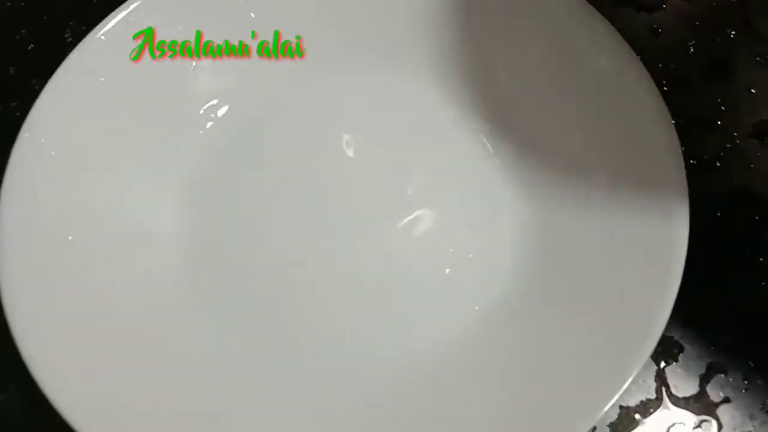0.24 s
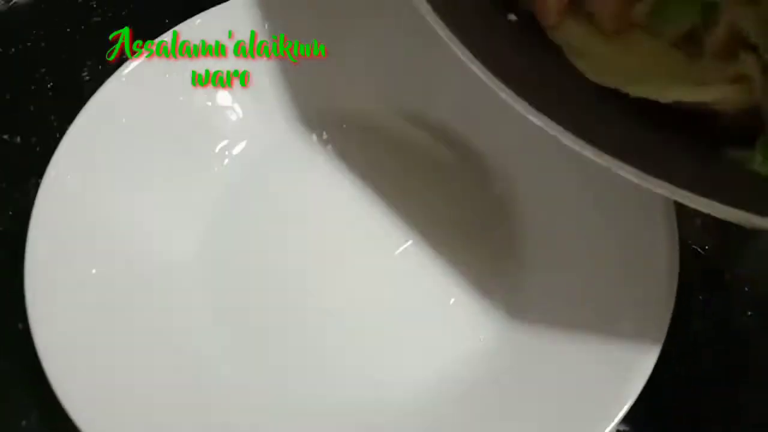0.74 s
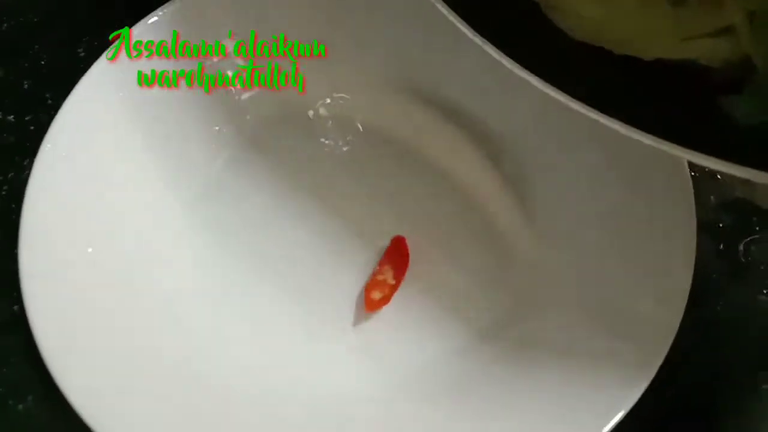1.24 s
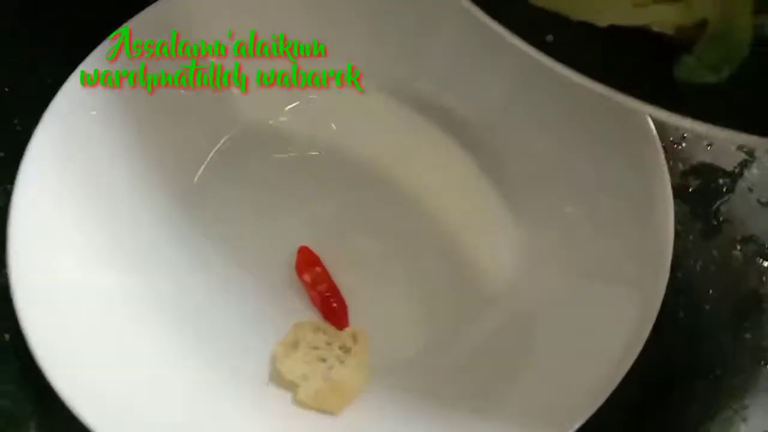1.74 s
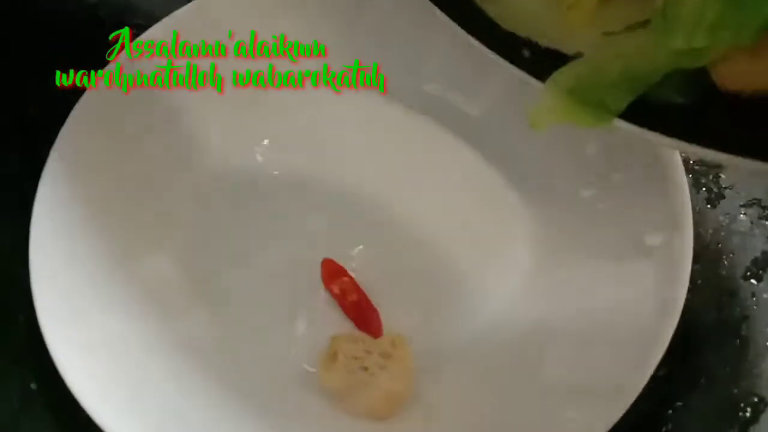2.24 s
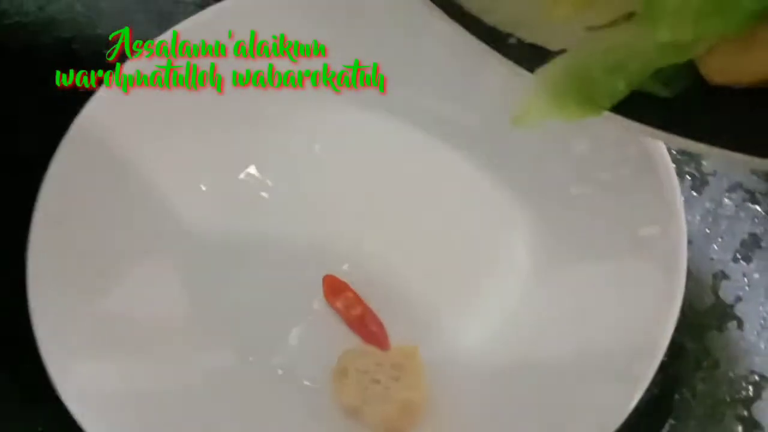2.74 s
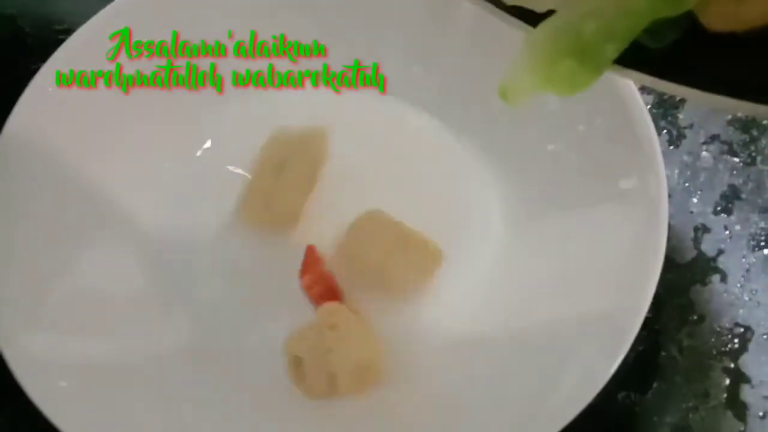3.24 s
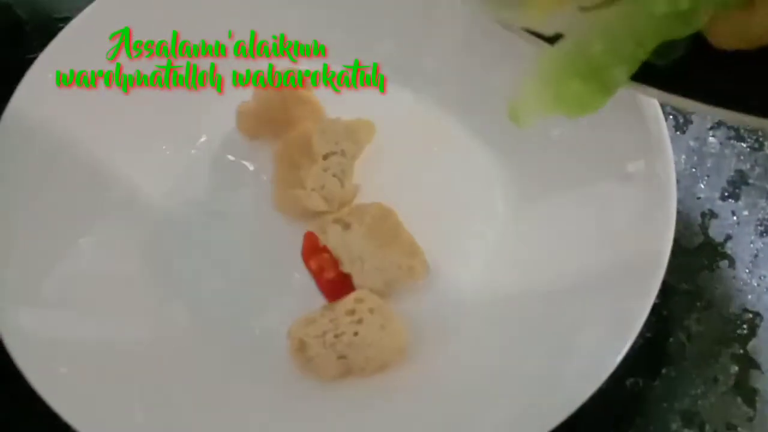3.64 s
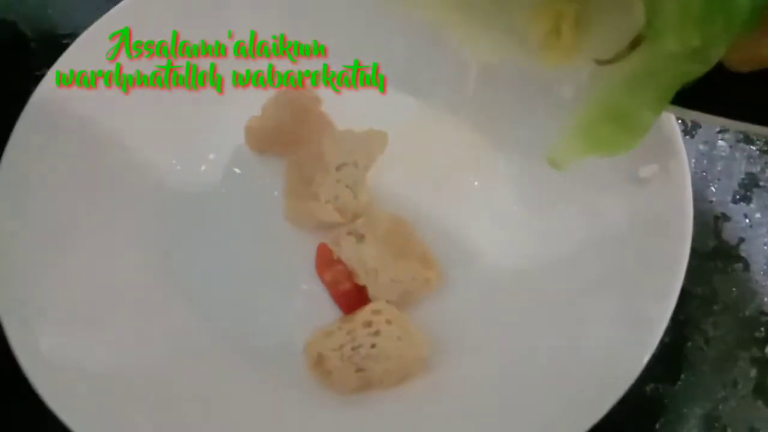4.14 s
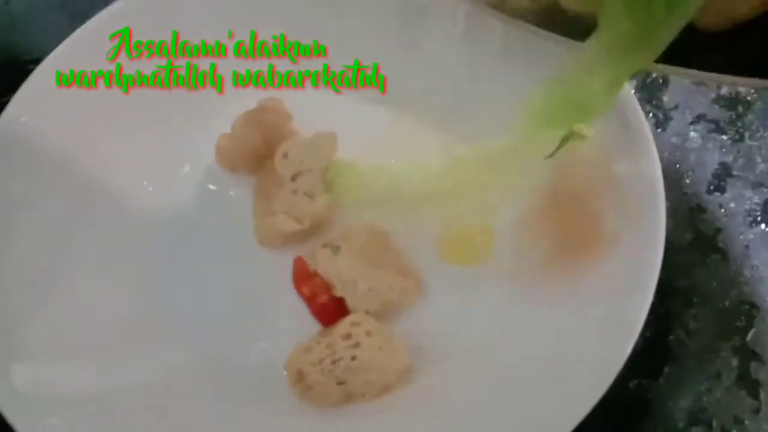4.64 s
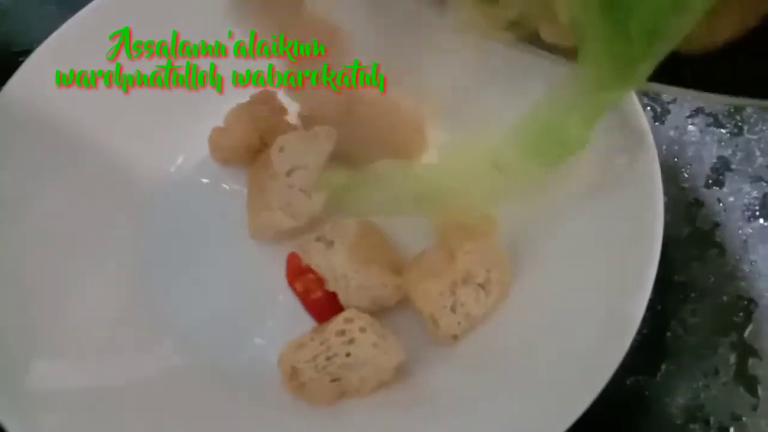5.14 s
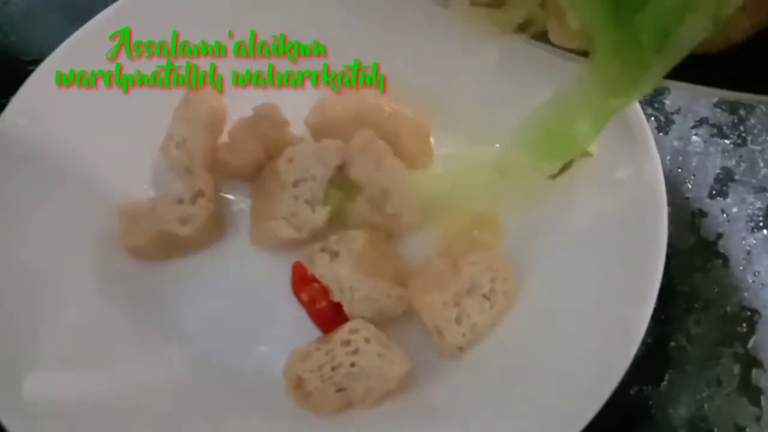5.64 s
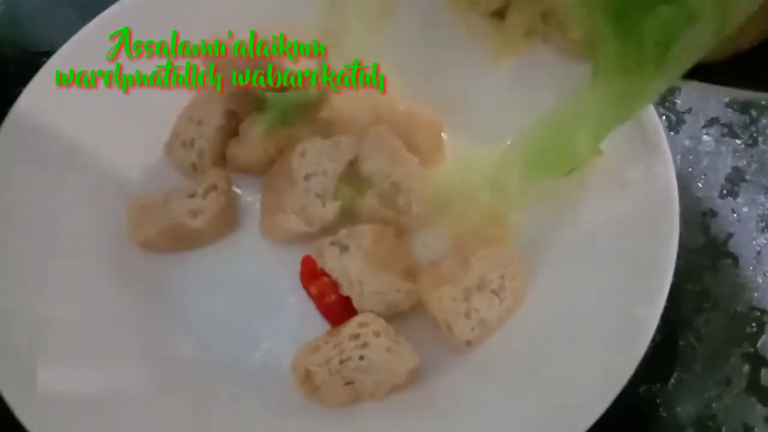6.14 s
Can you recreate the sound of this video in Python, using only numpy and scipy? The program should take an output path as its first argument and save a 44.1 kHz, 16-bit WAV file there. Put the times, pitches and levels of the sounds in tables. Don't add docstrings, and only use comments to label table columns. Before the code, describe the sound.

A metal pan is emptied onto a plate, heard close up on a phone microphone in a quiet kitchen. After a nearly silent start with slight squeaks, one strong, blunt metal knock stands far above everything else. Quiet rasping, ringing and low pan hum follow, with crisp little ticks and fat spits. Later come clusters of small food landings, lightly ringing the ceramic, densest at the end.

```python
import sys
import numpy as np
from scipy import signal
from scipy.fft import rfft, irfft, next_fast_len
from scipy.io import wavfile
from scipy.ndimage import uniform_filter1d

SR = 44100
rng = np.random.default_rng(int(sys.argv[2]) if len(sys.argv) > 2 else 0)


def volts_from_db(level):
    exponent = np.asarray(level, float) / 20
    return 10 ** exponent


def materialize(psi):
    bounded = np.clip(np.atleast_2d(psi).T, -1, 1)
    quanta = np.round(bounded * 32767).astype(np.int16)
    wavfile.write(sys.argv[1], SR, quanta)


N = 281358

# time_s, rasp_db (pressure), ring_db (lean on the pan wall)
DRAG = [(0.0, -96, -63.5), (0.42, -99, -76), (0.58, -71, -72), (0.78, -61.5, -65), (1.05, -66.5, -60.5),
        (1.22, -51.5, -58.5), (1.75, -51.5, -55.5), (2.2, -53, -67), (2.7, -49, -59), (3.07, -51.5, -72),
        (3.34, -51, -54), (3.62, -59, -59), (3.94, -56.5, -55.5), (4.3, -62, -60.5), (5.05, -60.5, -58),
        (5.4, -68.5, -60.5), (6.06, -59.5, -56), (6.38, -61.5, -63)]
# freq_hz, level_db
RASP_COLOUR = [(150, -43.5), (250, -20.5), (317, 0), (523, -24), (967, -13.5), (1160, -10), (1280, 3.5),
               (1550, -8.5), (2600, -2.5), (4240, -11.5), (5150, -10), (6350, -16), (7000, -9.5),
               (9100, -91), (15400, -120)]
# freq_hz, level_db
BRIGHT_COLOUR = [(3530, -29), (6000, -0.5), (6350, -21), (7500, 1.5), (8200, -6.5), (9960, -2.5),
                 (11700, -9.5), (13600, -23), (14900, -8.5), (15800, -10)]
# time_s, bright_lift_db
STEAM = [(0, 9), (1.2, -2), (1.5, 0), (2.4, -4), (3.0, -5.5), (3.75, 0.5), (3.85, 2.5), (4.2, 3),
         (4.4, 3.5), (4.6, 4.5), (4.8, 3.5), (5.2, 6), (5.5, 6), (6.38, 1)]
# freq_hz, width_hz, level_db
RIM_RESONANCES = [(805, 7, 5.4), (1853, 87, 2.7), (2315, 39, 1.1), (2670, 24, 0.78), (3527, 80, 2),
                  (5150, 200, 6), (5500, 200, 4)]
# freq_hz, width_hz, level_db
WALL_RESONANCES = [(1110, 14, -3), (1280, 21, 13.5), (1370, 62, -7.5), (1370, 27, -26)]
# start_s, hold_s, ring_db
LEANS = [(0.1, 0.053, -60), (0.22, 0.16, -62.5), (0.48, 0.11, -63.5), (0.7, 0.18, -58), (1.3, .14, -67),
         (1.553, 0.1, -61), (1.693, 0.021, -52), (1.907, 0.063, -54.5), (2.374, 0.026, -55),
         (2.531, 0.037, -56), (2.653, 0.14, -54.5), (2.876, 0.046, -56), (3.154, .25, -56),
         (3.439, 0.029, -53), (3.679, 0.048, -55), (3.926, 0.17, -57.5), (4.319, 0.046, -57),
         (4.45, .05, -59), (4.579, 0.011, -52.5), (4.62, 0.054, -54), (5.163, 0.016, -55),
         (5.61, 0.02, -58), (5.95, 0.058, -61), (6.29, 0.028, -62)]
# freq_hz, width_hz, level_db
BOTTOM_RESONANCES = [(111.3, 1.8, 9.5), (122.4, 4.4, 7.5), (146.25, 3.8, 16.5), (199, 4, 2.5)]
# start_s, hold_s, hum_db
SHUDDERS = [(0.107, 0.12, -52), (0.325, 0.026, -61), (0.546, 0.16, -65.5), (0.765, 0.1, -49),
            (1.04, 0.13, -51), (1.33, 0.043, -54), (1.48, 0.061, -53.5), (1.617, 0.097, -48.5),
            (1.838, 0.24, -51), (2.183, 0.036, -58.5), (2.325, 0.067, -58), (2.504, 0.04, -50.5),
            (2.603, 0.12, -50), (2.827, 0.077, -48), (2.976, 0.015, -53), (3.096, 0.13, -60),
            (3.348, 0.092, -54), (3.69, 0.015, -53.5), (3.813, 0.3, -48), (4.338, 0.035, -48),
            (4.543, 0.14, -57), (4.798, .05, -49), (4.966, 0.087, -47), (5.144, 0.17, -62),
            (5.562, 0.06, -49.5), (5.778, 0.025, -55), (5.87, 0.043, -54), (6.065, 0.21, -49)]
# freq_hz, width_hz, level_db
FLOOR_RESONANCES = [(236, 124, -11.5), (320, 23, -10.5), (362, 160, -13)]
# start_s, hold_s, hum_db
RUBS_EARLY = [
    (0.009, 0.25, -64),
    (0.34, 0.034, -73),
    (0.53, 0.072, -74),
    (0.687, 0.21, -75),
    (1.03, 0.053, -64),
]
RUBS_MIDDLE = [(1.457, 0.037, -53), (1.537, 0.057, -57), (1.671, 0.057, -55), (1.778, 0.099, -53),
               (1.964, 0.071, -52), (2.054, 0.047, -62), (2.217, 0.061, -63), (2.359, 0.045, -56),
               (2.599, 0.058, -56), (2.7, 0.045, -67), (2.836, 0.029, -73), (2.89, 0.08, -63),
               (3.018, 0.061, -60), (3.107, 0.061, -55), (3.281, 0.2, -56), (3.696, 0.035, -57),
               (3.79, 0.075, -52), (3.916, 0.089, -55), (4.109, 0.028, -62), (4.197, 0.052, -56),
               (4.349, 0.064, -61), (4.662, 0.025, -53), (4.836, 0.039, -56)]
RUBS_LATE = [
    (5.125, 0.042, -60),
    (5.227, 0.053, -77),
    (5.307, 0.052, -56.5),
    (5.467, 0.074, -65),
]
# start_s, length_s, from_hz, to_hz, level_db
SQUEAKS = [(0.03, 0.036, 1850, 1880, -74), (0.103, 0.17, 4970, 5000, -76), (0.471, 0.14, 4830, 5200, -74),
           (0.55, 0.054, 3850, 3770, -75), (0.557, 0.047, 3120, 3000, -70), (0.7, 0.19, 4500, 4640, -73),
           (0.716, 0.064, 4000, 4000, -69), (0.73, 0.16, 1825, 1910, -65.5), (0.74, 0.095, 2150, 2300, -67),
           (0.735, .12, 3250, 3400, -72), (0.98, 0.12, 5340, 5280, -69), (0.992, 0.082, 2250, 2360, -69),
           (2.4, .15, 5100, 5150, -73), (2.62, 0.22, 5120, 5100, -62), (2.65, 0.32, 5900, 5640, -64),
           (2.818, .22, 5040, 5100, -69), (2.88, 0.2, 5930, 5750, -66), (2.503, 0.22, 3470, 3380, -66),
           (3.05, .12, 5200, 5100, -76), (3.403, 0.088, 3320, 3270, -61), (4.335, .03, 1650, 1670, -65),
           (4.572, 0.05, 3300, 3300, -65), (4.555, 0.036, 1620, 1680, -63.5), (4.78, .06, 2300, 2250, -66),
           (5.53, .12, 5350, 5450, -65.5), (5.63, 0.093, 5150, 4900, -69), (5.62, .04, 3600, 3780, -68),
           (5.717, .02, 2650, 2750, -66), (5.72, 0.074, 4800, 4850, -70), (5.79, .07, 5200, 5330, -72),
           (1.353, 0.5, 5230, 5120, -69), (3.551, .45, 5240, 5250, -72), (4.107, .45, 5170, 5320, -76),
           (4.599, 0.54, 5300, 5410, -70.5), (5.102, .4, 5350, 5200, -70), (5.9, 0.42, 5240, 5200, -70)]
# freq_hz, level_db, t60_s
PAN_MODES = [(145, -13, .2), (224, -15, .15), (285, -8, .12), (314, -12, .2), (364, -17, .16),
             (452, -14, .33), (473, 0, .125), (515, -8, .12), (593, -3, .1), (651, -23, .2), (831, 3, .18),
             (864, -9, .2), (942, -13, .12), (1030, -12, .12), (1061, -16, .35), (1193, -6, .21),
             (1329, -12, .55), (1356, -17, .25), (1755, -19, .45), (2581, -13, .4), (2620, -22, .2),
             (2870, -14, .16), (2974, -21, .2), (3101, -17, .17), (3268, -18, .2), (3951, -20, .17),
             (4334, -19, .17), (4829, -20, .12), (5071, -21, .17)]
# low_hz, high_hz, level_db, t60_s
PAN_CLATTER = [(150, 620, -14.5, .3), (650, 1500, -13.5, .22), (1500, 2500, -22, .2), (2600, 5600, -9, .21),
               (6600, 7900, -20, .24), (8500, 14000, -20, .11)]
# start_s, strength_db, middle_db, high_db, contact_ms
KNOCKS = [
    (1.061, -25, -2.5, 2, 1.7),
    (1.0645, -32.5, -33, -30, 1.2),
    (1.087, -14.5, -21, -42, 6.1),
    (1.096, -24, -0.5, -4.5, 8.5),
    (1.104, -41, 11, -33, 6.3),
]
# freq_hz, level_db, t60_s
LANDING_MODES = [(221, 5, 0.14), (292, 4, .14), (438, -22, .12), (470.7, -3, 0.11), (583, 2, 0.085),
                 (623, -20, 0.11), (797, -9, 0.17), (1060, -8, 0.27), (1330, -6, 0.2), (1620, -15, .1)]
# start_s, strength_db, middle_db, high_db, contact_ms
LANDINGS = [
    (1.341, -39, -6, -20, 1.8),
    (1.351, -42, -5, -20, 2.7),
    (1.372, -41.5, -8, -20, 2.1),
    (1.408, -56, 8, -20, 5.4),
]
# freq_hz, level_db, t60_s
PLATE_MODES = [(278, 4, 0.029), (319.6, 6, 0.083), (428, 1, 0.085), (579.5, 3, 0.076), (622.6, -7.5, 0.23),
               (734, -12, 0.17), (869.5, -1.5, 0.049), (930, -13.5, 0.062), (998, -11, 0.16),
               (1025, 1.5, 0.13), (1287, 3.5, 0.043), (1470, -0.5, 0.032), (1510, -22, 0.019),
               (1790, -20, 0.23), (1925, -26.5, 0.15), (2300, -11, 0.033), (2705, -18, 0.082)]
# low_hz, high_hz, level_db, t60_s
PLATE_CLATTER = [(250, 900, -8, .13), (900, 1700, -7, .09), (1900, 7500, -10.5, .11)]
# start_s, strength_db, middle_db, high_db, contact_ms
DROPS = [(4.879, -55, -5, -20, 2.7), (4.8925, -33, -10, -13, 0.18), (4.899, -44.5, 13.5, 4, 7.1),
         (4.9155, -30.5, -3.5, -7, 0.35), (4.932, -45, 3, -13, 5.5), (4.946, -45, -10, -10, 5.8),
         (4.962, -45, 11.5, -13, 7.2), (4.975, -32.5, -3, 4, 12), (4.998, -43, 3, 0, 10),
         (5.021, -45, -3, -17, 3.1), (5.0375, -27.5, 1, -8, 0.42), (5.091, -49, 4, -10, 5),
         (5.167, -57, -1, 12.5, 2.5), (5.561, -40.5, -6, 4, 7.4), (5.58, -38.5, 1, 0, 10.6),
         (5.612, -45, -6, 0, 4.4), (5.667, -31, -29, -17, 11), (5.6965, -38.5, -1.5, -7, 0.63),
         (5.973, -47, -11, -18, 2.6), (5.985, -42, -10, -25, 7), (5.993, -31, -7, -31, 8.8),
         (6.0085, -33, 3.5, 1, 0.3), (6.036, -44, -5, -20, 4.3), (6.048, -31, -9, -22, 7.5),
         (6.068, -32, 3.5, 5, 9.3), (6.089, -40, -10, -14, 6.7), (6.104, -36, -11, -20, 11),
         (6.116, -39, -2.5, -17, 5.6), (6.136, -31.5, 2, -2.5, 0.73), (6.147, -36, 0, -8, 1.1),
         (6.172, -47, 4.5, -6, 2.7), (6.371, -43.5, 13.5, 7.5, 2.3)]
# start_s, peak_db, centre_hz
TICKS = [(0.9434, -41, 6140), (1.322, -52, 1390), (1.3227, -34.5, 2100), (1.344, -34, 2670),
         (1.488, -36.5, 2800), (1.541, -35, 3280), (1.875, -30, 3460), (1.9528, -32, 3400),
         (2.364, -25, 4330), (2.529, -38, 2230), (2.6613, -38.5, 4800), (2.838, -43, 2590),
         (3.185, -50, 2280), (3.251, -27.5, 3300), (3.3043, -38.5, 5500), (3.3402, -36, 2530),
         (3.455, -36.5, 4430), (3.681, -45, 3330), (4.9782, -31, 4780), (5.0383, -28, 4370),
         (5.1656, -40.5, 3650), (5.8647, -39, 4200), (5.875, -41, 2130), (5.885, -46, 4000),
         (6.01, -45, 2440), (6.078, -25.5, 4960)]
# start_s, peak_db, centre_hz
SPITS = [(0.9458, -42, 9100), (1.064, -27, 9700), (1.322, -39, 8700), (1.491, -29, 11600),
         (1.582, -41, 10300), (1.6053, -42, 10500), (1.623, -36, 11100), (1.767, -36.5, 8600),
         (1.824, -39, 11900), (1.876, -33.5, 8900), (1.8754, -36, 14000), (1.907, -35, 10900),
         (2.012, -42.5, 9700), (2.3014, -39, 9200), (2.365, -29, 9200), (2.785, -40, 9400),
         (3.254, -36, 11400), (3.306, -41, 10100), (4.143, -43.5, 9400), (4.585, -39.5, 11100),
         (4.974, -41, 8300), (5.8645, -37.5, 7200), (5.883, -46, 8950), (5.94, -50, 7200),
         (6.01, -41, 5100), (6.046, -48, 8000), (6.372, -40.5, 7640), (6.0765, -40, 8100)]
# start_s, peak_db, centre_hz, length_ms
SCUFFS = [
    (3.225, -42.5, 1060, 45),
    (3.27, -47.5, 744, 38),
    (3.30, -47, 400, 110),
    (3.335, -41, 1400, 23),
    (3.37, -49, 740, 17),
    (2.70, -43, 1610, 38),
    (2.88, -53.5, 885, 89),
    (3.345, -58, 2600, 14),
]
# start_s, peak_db, pitch_hz, length_ms
THUDS = [
    (1.0611, -2.5, 192, 1.64),
    (1.0638, -4.5, 81, 7.9),
    (1.3422, -22, 236, 4.5),
    (1.347, -20, 77, 12),
    (1.371, -33, 291, 39),
    (1.701, -47, 80, 10),
    (3.126, -32, 80, 14),
    (3.825, -20.5, 75, 23),
    (4.916, -36, 305, 7.9),
    (5.992, -30, 298, 28),
]
# freq_hz, level_db
HISS_COLOUR = [(15, -48), (25, -21), (144, 7.5), (248, -10), (382, -0.5), (437, -11), (691, -13.5),
               (881, -13.5), (1280, -12), (1590, -17), (3780, -20), (5500, -23.5), (6310, -25),
               (15800, -35.5)]
# freq_hz, level_db
SIDE_COLOUR = [(15, -29), (25, -6), (130, -10), (222, -14), (392, -15), (513, -8.5), (955, -17),
               (1280, 1.5), (1470, -11.5), (5670, -23.5), (7220, -48), (14600, -27.5), (15800, -33)]
# freq_hz, level_db
MIC = [(20, -31), (60, -42), (100, -3.5), (5300, -3), (6350, -3.5), (7300, -4), (10000, -5), (13600, -13),
       (15000, 4), (16300, -23), (18000, -67)]

FIRM_DB = -55


def drag():
    rasp_db = curves(DRAG)[0]
    bright_db = -63.5 + 0.88 * (rasp_db - FIRM_DB) + curves(STEAM)[0]
    bright_db[:int(np.ceil(0.73 * SR))] -= 3
    slips = level(grit(3500, 0.5), 0) * volts_from_db(2.0 * walk(29.96))
    rim = resonate(slips, RIM_RESONANCES) * volts_from_db(-21.5)
    rasp = level(coloured(level(slips, 0) + rim, RASP_COLOUR), 0)
    bright = level(coloured(slips * volts_from_db(0.5 * walk(20.0)), BRIGHT_COLOUR), 0)
    return rasp * volts_from_db(rasp_db - 4.0) + bright * volts_from_db(bright_db - 4.0)


def wall():
    sing = level(resonate(rng.standard_normal(N) * volts_from_db(0.44 * walk(49)), WALL_RESONANCES), 0)
    sing = sing / uniform_filter1d(sing ** 2, size=1500) ** 0.079
    leans = swells(LEANS, rise_s=0.01, fall_s=0.0083)
    return sing * np.hypot(volts_from_db(curves(DRAG)[1] - 3.0), volts_from_db(-1.0) * leans)


def shudder():
    hum = resonate(rng.standard_normal(N), BOTTOM_RESONANCES)
    hum = hum / np.sqrt(uniform_filter1d(hum ** 2, size=3000))
    rest_db = -93
    hum_gain = volts_from_db(rest_db) + swells(SHUDDERS, rise_s=0.023, fall_s=0.021)
    upper = level(resonate(rng.standard_normal(N) * volts_from_db(4.6 * walk(25.17)), FLOOR_RESONANCES), 0)
    upper_db = -62.5 + 0.1 * (curves(DRAG)[0] - FIRM_DB)
    rubs = swells(RUBS_EARLY + RUBS_MIDDLE + RUBS_LATE, rise_s=0.005, fall_s=0.026)
    return hum_gain * hum + upper * np.hypot(volts_from_db(upper_db), volts_from_db(-4.0) * rubs)


def squeaks():
    out, t = np.zeros(N + SR // 2), np.arange(SR // 2) / SR
    rough_pairs = rng.standard_normal((len(SQUEAKS), 2, SR // 2))
    for (s, length, from_hz, to_hz, db), rough in zip(SQUEAKS, rough_pairs):
        k = int(SR / (0.06 * from_hz))
        waver = uniform_filter1d(uniform_filter1d(rough, k), k)
        glide_hz = from_hz + (to_hz - from_hz) * t / length
        phase = 2 * np.pi * np.cumsum(glide_hz) / SR
        tone = level(waver[0] * np.cos(phase) + waver[1] * np.sin(phase), db)
        at = int(s * SR)
        out[at:at + SR // 2] += tone * np.sin(np.pi * np.clip(t / length, 0, 1)) ** .5
    return out[:N]


def knocked_pan():
    knock = struck(KNOCKS, PAN_MODES, [700, 2000], PAN_CLATTER, touch=1.39)
    landing_clatter = [(150, 560, -4.0, 0.15), (800, 1500, -3, .15)]  # low_hz, high_hz, level_db, t60_s
    return knock + struck(LANDINGS, LANDING_MODES, [700, 2000], landing_clatter, touch=0.51)


def dropped_food():
    return volts_from_db(-11) * struck(DROPS, PLATE_MODES, [900, 2000], PLATE_CLATTER, touch=2.69)


def wet_pops():
    ticks = pops([(*tick, 2.67) for tick in TICKS], spread=1.58)
    spits = pops([(*spit, 2.7) for spit in SPITS], spread=1.16)
    return ticks + spits + pops(SCUFFS, spread=1.163)


def thuds():
    out, t = np.zeros(N + 4096), np.arange(4096) / SR
    for s, db, hz, ms in THUDS:
        at = int(s * SR)
        out[at:at + 4096] -= volts_from_db(db) * np.sin(2 * np.pi * hz * t) * np.exp(-t / (ms / 1000))
    return out[:N]


def room_echo(x):
    t60_s, room_db = .2, -9
    t = np.arange(SR // 2) / SR
    fade = bandpass(rng.standard_normal(len(t)) * np.exp(-np.log(1000) * t / t60_s), 250, 9000, 2)
    fade = fade / np.sqrt(np.sum(fade ** 2))
    return volts_from_db(room_db) * signal.fftconvolve(x, fade)[:N]


def room_hiss():
    return level(coloured(rng.standard_normal(N), HISS_COLOUR), -60.5) * volts_from_db(0.49 * walk(4.0))


def channel_difference(steady):
    side = level(coloured(rng.standard_normal(N), SIDE_COLOUR), -82) * volts_from_db(5 * walk(3.64))
    return mottled(side + volts_from_db(-36.0) * np.roll(steady, shift=400), 8.2)


def struck(blows, modes, split_hz, clatters, touch):
    hard_ms = 3.1
    push, t = np.zeros((3, N + 2048)), np.arange(2048) / SR
    click = np.arange(2048) == 64
    for (s, db, middle_db, high_db, ms), rough in zip(blows, rng.standard_normal((len(blows), 2048))):
        ms = max(ms, .2)
        burst = rough * t * np.exp(-t / (ms / 2000))
        burst = burst / np.sqrt(np.sum(burst ** 2)) + touch * min(hard_ms / ms, 1) * click
        at = int(s * SR)
        push[:, at:at + 2048] += volts_from_db(db + np.array([0, middle_db, high_db]))[:, None] * burst
    mode_hz = [m[0] for m in modes]
    group = np.searchsorted(split_hz, mode_hz)
    sign = (-1) ** np.cumsum(np.diff(np.log(mode_hz), prepend=0) > .07)
    live = slice(int(blows[0][0] * SR), min(int((blows[-1][0] + 1) * SR), N))
    out = np.zeros(N)
    for k, (hz, db, t60) in enumerate(modes):
        out[live] += sign[k] * volts_from_db(db) * ring(push[group[k], live], hz, t60)
    for lo_hz, hi_hz, db, t60 in clatters:
        band = np.searchsorted(split_hz, np.sqrt(lo_hz * hi_hz))
        out += clatter(push[band], lo_hz, hi_hz, db, t60)
    return out


def clatter(push, lo_hz, hi_hz, db, t60):
    r = np.exp(-2 * np.log(1000) / (t60 * SR))
    noise = bandpass(rng.standard_normal(N), lo_hz, hi_hz, 3)
    return level(noise, db) * np.sqrt(signal.lfilter([1], [1, -r], push[:N] ** 2))


def ring(x, hz, t60):
    r = np.exp(-np.log(1000) / (np.clip(t60, 1 / 200, 1 / 2) * SR))
    w = 2 * np.pi * hz / SR
    return signal.lfilter([0, r * np.sin(w)], [1, -2 * r * np.cos(w), r * r], x)


def resonate(x, peaks):
    return sum(level(ring(x, hz, np.log(1000) / (np.pi * width)), db) for hz, width, db in peaks)


def pops(table, spread):
    out, t = np.zeros(N + 8192), np.arange(8192) / SR
    for (s, db, hz, ms), rough in zip(table, rng.standard_normal((len(table), 8192))):
        fade = t / (ms / 1000)
        pop = bandpass(rough * np.tanh(4.8 * fade) * np.exp(-fade), hz / spread, hz * spread, 2)
        at = int(s * SR)
        out[at:at + 8192] += volts_from_db(db) * pop / np.abs(pop).max()
    return out[:N]


def grit(rate, scatter_db):
    return (rng.random(N) < rate / SR) * rng.standard_normal(N) * volts_from_db(scatter_db * rng.exponential(size=N))


def mottled(x, patchy_db):
    z = signal.stft(x, nperseg=512)[2]
    field = uniform_filter1d(rng.standard_normal(z.shape), size=2, axis=0)
    field = uniform_filter1d(field, size=9, axis=1)
    return signal.istft(z * volts_from_db(patchy_db * field / field.std()), nperseg=512)[1][:N]


def walk(rate):
    k = int(SR / rate)
    held = np.repeat(rng.standard_normal(N // k + 1), k)
    return 0.98 * uniform_filter1d(uniform_filter1d(held, k), k)[:N]


def curves(table):
    s, *columns = np.transpose(np.vstack(table))
    return [np.interp(np.arange(N) / SR, s, c) for c in columns]


def swells(table, rise_s, fall_s):
    t = np.arange(0, N, 32) / SR
    start, hold, db = np.transpose(table)[:, :, None]
    rise = (np.minimum(t - start, 0) / rise_s) ** 2
    fall = np.maximum(t - start - hold, 0) / fall_s
    gain = np.max(volts_from_db(db) * np.exp(-rise - fall), axis=0)
    return np.interp(np.arange(N) / SR, t, gain)


def level(x, db):
    return x * volts_from_db(db) / np.sqrt(np.mean(x ** 2))


def bandpass(x, lo_hz, hi_hz, order):
    return signal.sosfilt(signal.butter(order, [lo_hz, hi_hz], "band", fs=SR, output="sos"), x)


def coloured(x, shape):
    hz, db = np.transpose(shape)
    size = next_fast_len(N)
    f = np.maximum(np.arange(size // 2 + 1) * SR / size, 1)
    gain = volts_from_db(np.interp(np.log(f), np.log(hz), db, left=-120, right=-120))
    return irfft(rfft(x, size) * gain, size)[:N]


def causal(x, shape):
    hz, db = np.transpose(shape)
    size = next_fast_len(N)
    f = np.maximum(np.arange(size // 2 + 1) * SR / size, 1)
    quefrency = irfft(np.log(volts_from_db(np.interp(np.log(f), np.log(hz), db))), size)
    quefrency[1:size // 2] *= 2
    quefrency[size // 2 + 1:] = 0
    return irfft(rfft(x, size) * np.exp(rfft(quefrency)), size)[:N]


def scene():
    steady = mottled(drag() + room_hiss(), 2.4) + wall() + shudder() + squeaks()
    steady = signal.sosfilt(signal.ellip(8, .2, 60, 15550, fs=SR, output="sos"), steady)
    steady = signal.sosfilt(signal.butter(4, 68, "high", fs=SR, output="sos"), steady)
    small = wet_pops() + thuds()
    hits = knocked_pan() + dropped_food() + small + room_echo(small)
    mid = causal(hits, MIC) + steady
    side = channel_difference(steady)
    return np.array([mid + side, mid - side])


def top_cut(x):
    return signal.sosfilt(signal.butter(12, 16620, fs=SR, output="sos"), x)


def record(dry):
    return top_cut(dry)


dry = scene()
out = record(dry)
materialize(out)
```